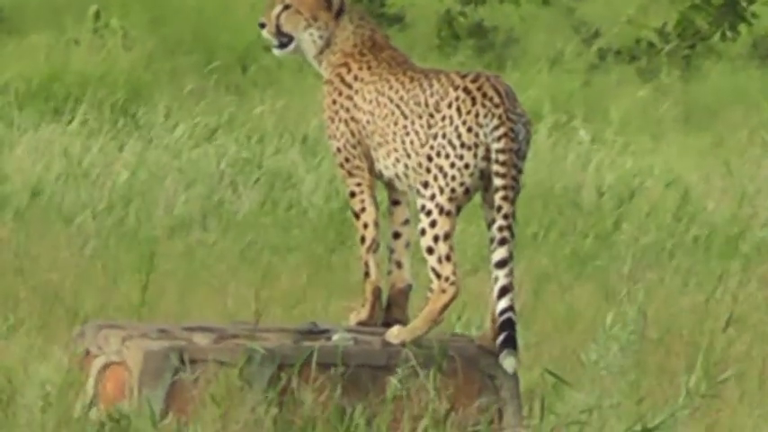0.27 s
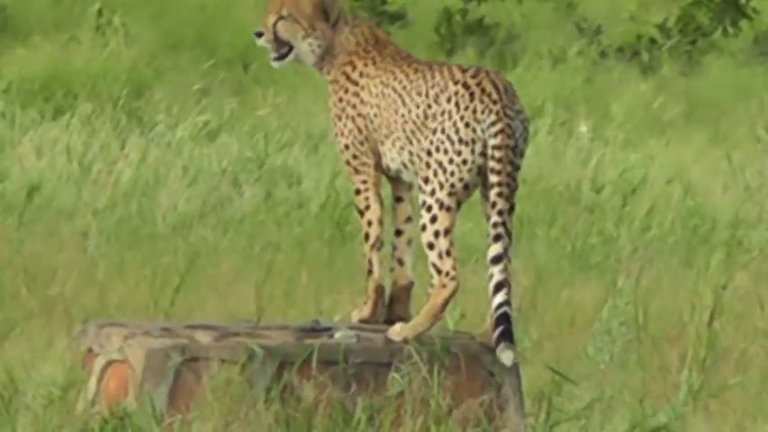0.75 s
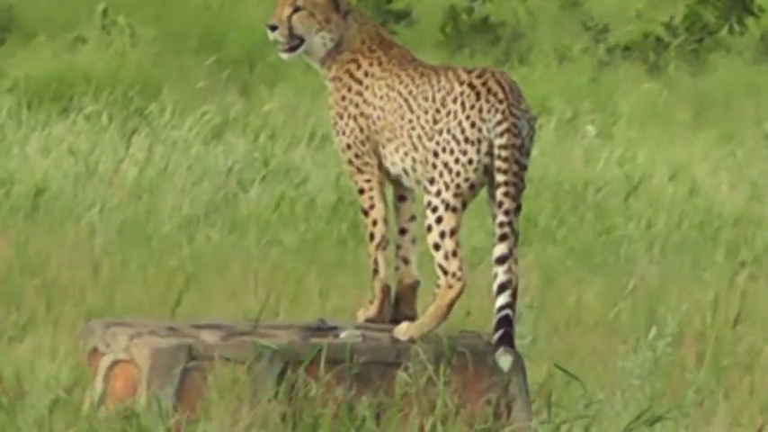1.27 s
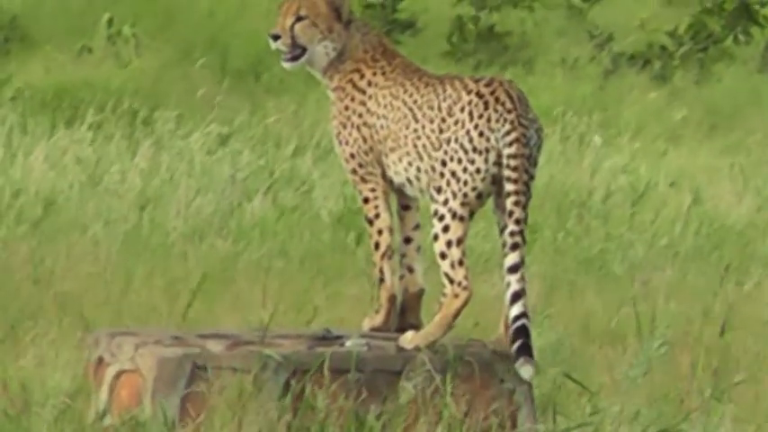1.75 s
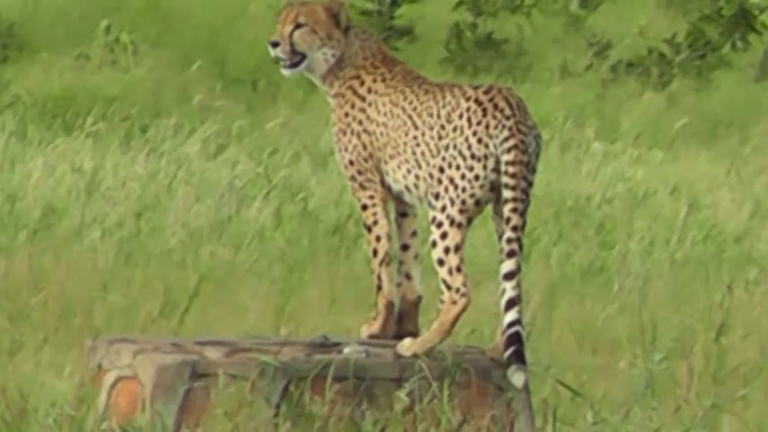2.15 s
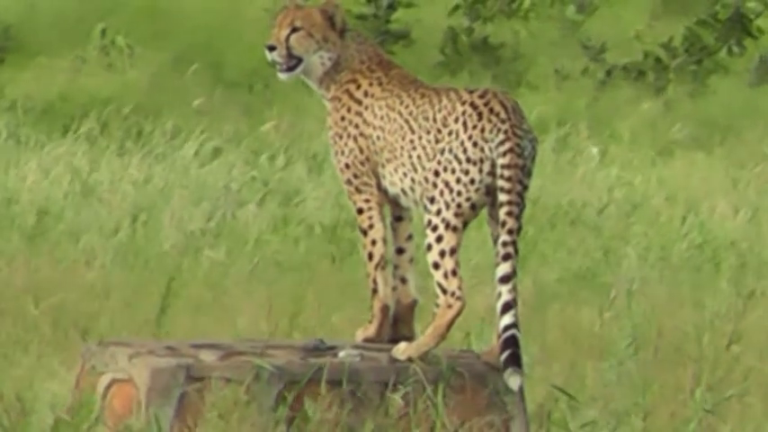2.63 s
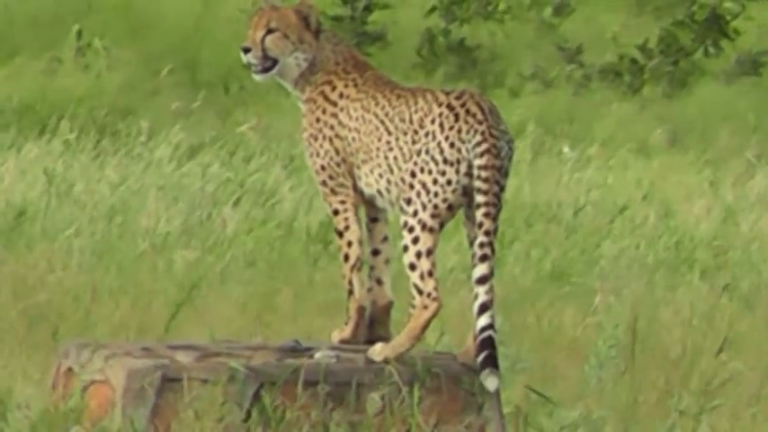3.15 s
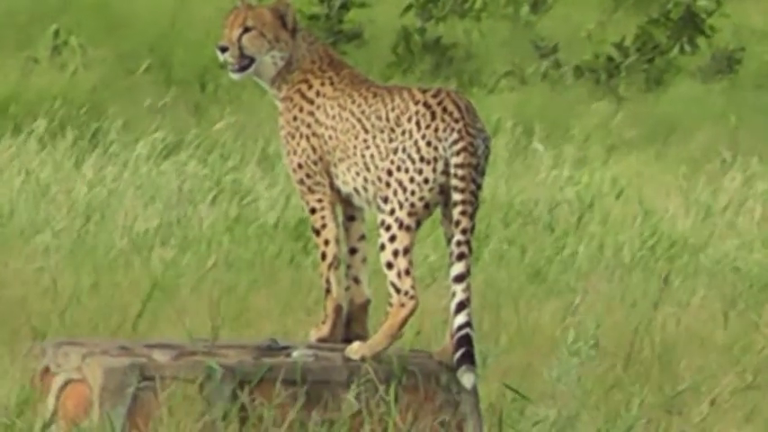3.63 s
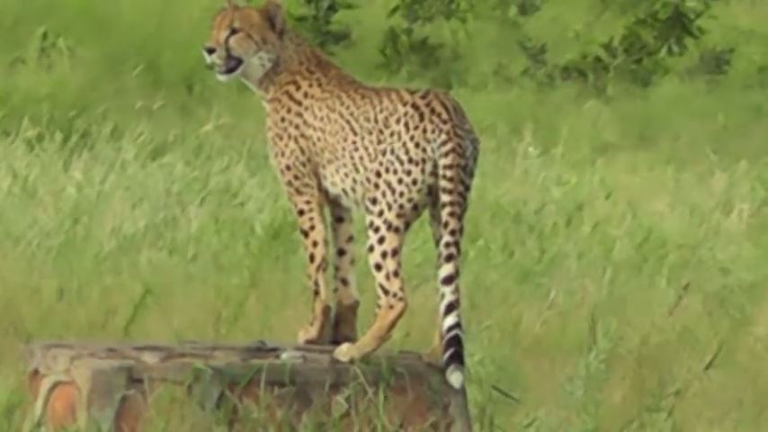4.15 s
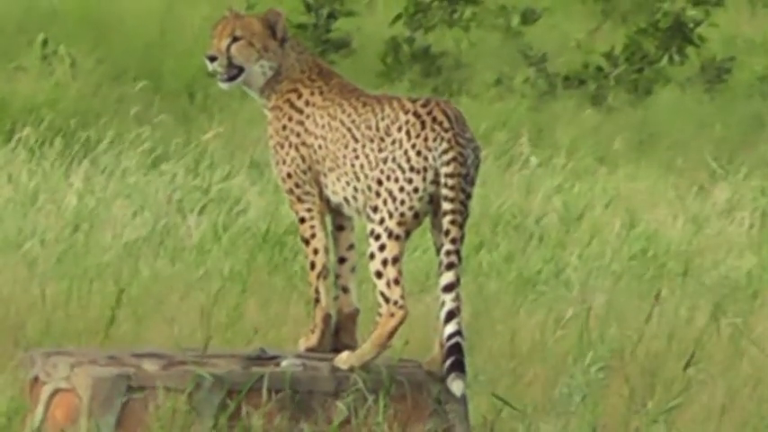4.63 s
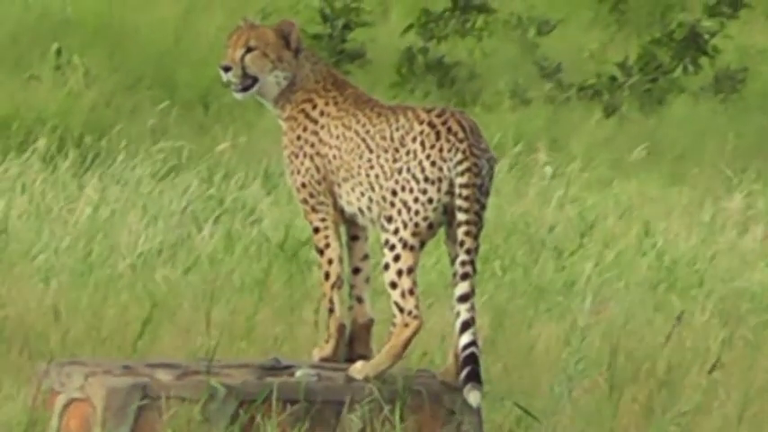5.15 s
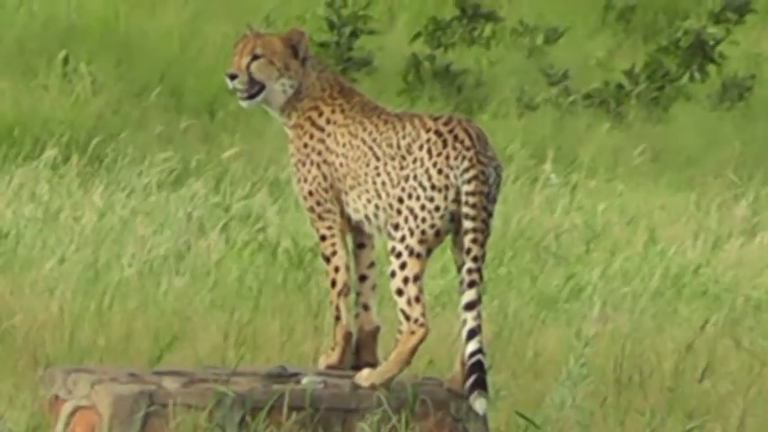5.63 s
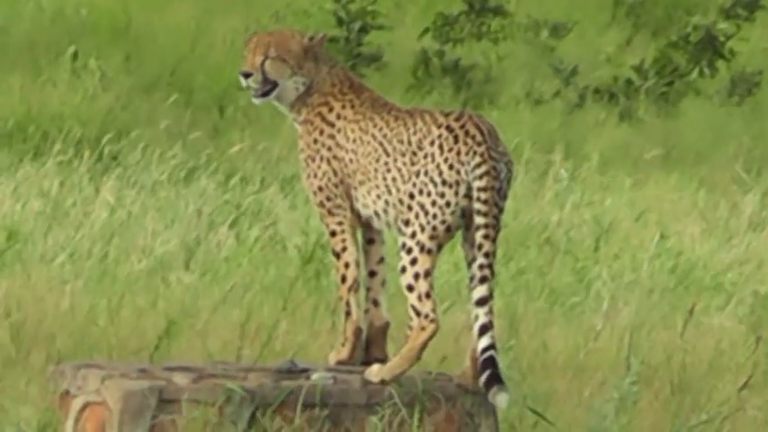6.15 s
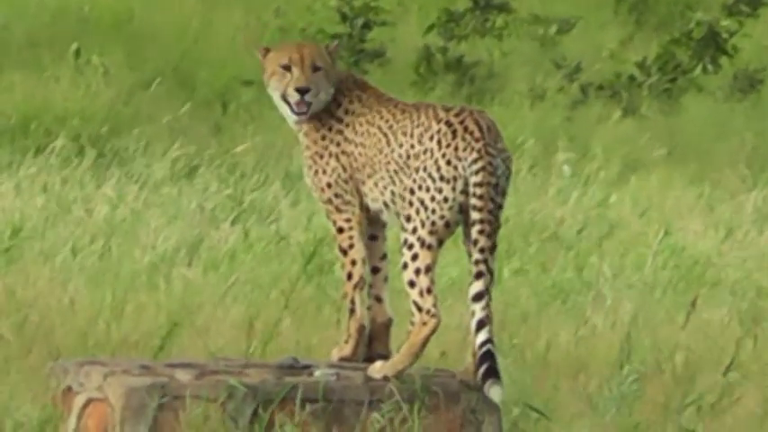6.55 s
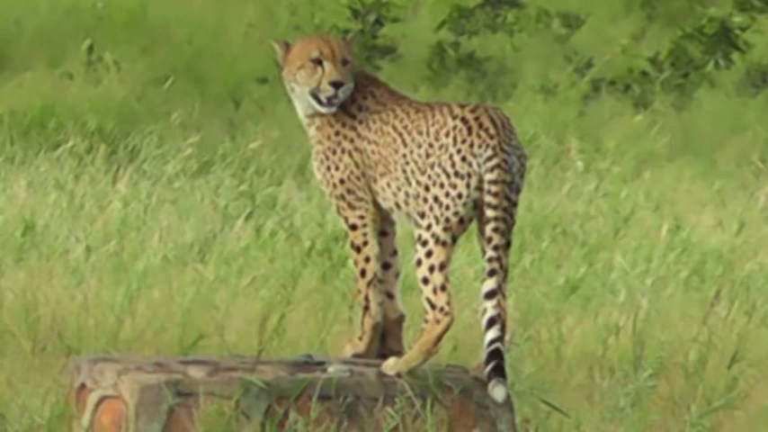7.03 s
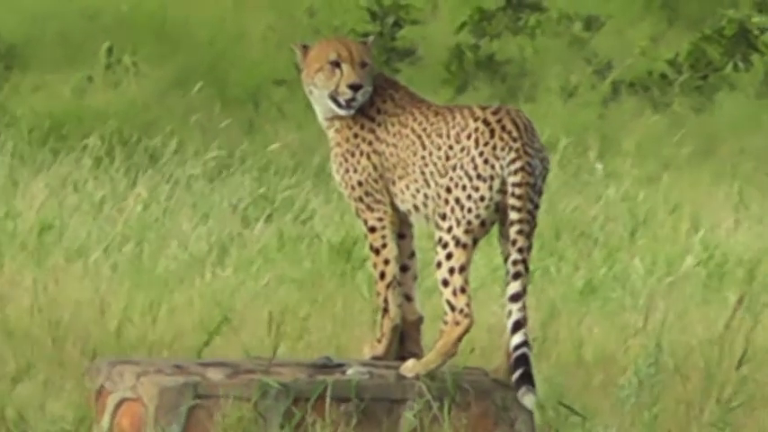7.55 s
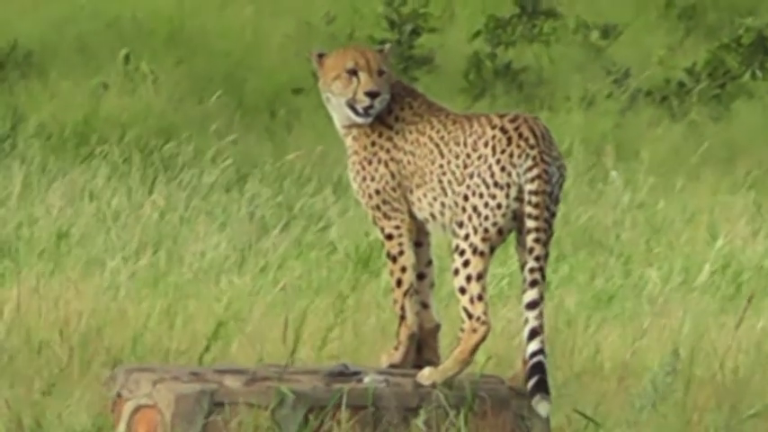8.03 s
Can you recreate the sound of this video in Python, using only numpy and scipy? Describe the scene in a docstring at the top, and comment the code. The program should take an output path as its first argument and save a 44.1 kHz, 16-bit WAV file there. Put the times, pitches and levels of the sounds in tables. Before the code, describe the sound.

Open grassland with low wind thumping on the microphone. A cheetah, slightly left and fairly near, utters a very short, high, falling chirp like a bird's, and a nearby camera immediately rattles off three mechanical shutter clacks. A quieter stretch follows with faint insects, thin small-bird notes and a far bird hooting and trilling. Gusts rise again, and the cheetah chirps a second time near the end.

```python
"""Cheetah chirps and a camera burst

A cheetah gives two short, falling, bird-like chirps in open grassland, built from harmonics through a throat colour.
After the first, a camera fires three frames: clusters of noise clacks, body rings and motor noise.
Gusts of low noise buffet the microphone. Far off a bird hoots and trills, small birds give thin
sliding notes and insects chirp in pulsed tones, over knocks, rustles and the hush of the meadow."""
import sys
import numpy as np
from scipy import signal
from scipy.fft import rfft, irfft, next_fast_len
from scipy.io import wavfile
from scipy.ndimage import uniform_filter1d, map_coordinates

SR = 44100
rng = np.random.default_rng(int(sys.argv[2]) if len(sys.argv) > 2 else 0)


def master_out(mix):
    """Clip the mix to full scale and print it as 16-bit PCM to the path in sys.argv[1]."""
    frames = np.transpose(np.atleast_2d(mix))
    ceiling = np.clip(frames, -1, 1)
    pcm = np.round(ceiling * 32767).astype(np.int16)
    wavfile.write(sys.argv[1], SR, pcm)


N = 365148

# Cheetah chirps. Each row: start in seconds, time until the voice breaks in seconds,
# time until it lets go in seconds, level ahead of the throat in dB, roughness of the clear part (0-1).
CHIRPS = [(0.8734, 0.031, 0.05, -28, 0.09), (6.7334, 0.043, 0.044, -28, 0.1)]
# Fundamental of each chirp, one list per chirp. Each row: time in seconds, pitch in Hz.
CHIRP_PITCH = [
    [(.878, 1122), (.911, 1070), (.924, 945), (.934, 800), (.944, 712), (.965, 680)],
    [(6.742, 1090), (6.766, 975), (6.777, 965), (6.785, 825), (6.801, 690), (6.812, 640)],
]
# Squeaks opening the chirps. Each row: start in seconds, length in seconds, start pitch in Hz,
# end pitch in Hz, level in dB.
SQUEAKS = [(0.86, .019, 2400, 2720, -48.5), (6.7216, 0.028, 2760, 2450, -38)]
# Throat and open mouth. Each row: frequency in Hz, gain in dB.
THROAT = [(400, -27), (720, -17), (1050, -19.5), (1450, -9.5), (1750, -15.5), (2000, 3), (2280, -5),
          (2700, -10.5), (3250, -15.5), (3900, -30), (4500, -36), (5200, -37), (6500, -80)]
# Echo from the bushes; the cat turns its head away. Each row: time in seconds, echo gain in dB.
FACING = [(0, -32), (6.2, -33), (6.5, -52)]
ATTACK_S, RELEASE_DB_PER_S = 0.0074, 950
BREAK_S = 0.0014  # time scale of the break from clear whistle to full voice
CLEAR_ODD_DB, BROKEN_ODD_DB = -37, -0.5  # odd harmonics before and after the break
SLACK_ROUGH, SLACKEN_S = 0.35, 0.0023  # roughness (0-1) after letting go, time scale of its onset

# Shutter releases. Each row: start in seconds, gain in dB.
FRAMES = [(1.0950, -1.5), (1.3056, -1.5), (1.5162, -1.5)]
# Mirror and shutter contacts in a frame. Each row: delay in seconds, level in dB, t60 in seconds,
# treble corner in Hz.
CONTACTS = [(0, -30.5, 0.077, 6500), (.005, -22.5, 0.054, 15000), (.0112, -21.5, 0.027, 10800),
            (0.016, -26.5, 0.039, 7000), (0.053, -31, 0.081, 9000), (0.0563, -35.5, 0.039, 9000),
            (0.0691, -25.5, 0.048, 22000), (.080, -27.5, 0.057, 11000), (.086, -44, .07, 9000),
            (.105, -37.5, 0.062, 18000), (.1645, -27.5, 0.025, 5650), (.168, -26, 0.027, 3990),
            (.177, -38, 0.029, 3500)]
# Camera body rings. Each row: delay in seconds, frequency in Hz, level in dB, t60 in seconds.
BODY_RINGS = [(.009, 450, -37.5, 0.076), (.055, 960, -36, 0.025), (.055, 1273, -36.5, 0.029),
              (.080, 260, -44, 0.053), (.080, 860, -37, .025), (.084, 642, -36.5, 0.051)]
# Colour of the casing. Each row: frequency in Hz, relative level in dB.
CASING = [(150, -6), (330, -14), (650, 0.5), (1200, -10), (1750, 3.5), (2150, 0), (2550, 4.5), (3100, 3),
          (4400, 2), (5400, 4), (8500, 0.5), (12000, 3), (16000, -5.5)]
# Motor recocking the shutter. Each row: delay in seconds, level in dB.
WINDER = [(.07, -52.5), (.10, -40.5), (.125, -53), (.165, -46), (.19, -54), (.23, -70)]
# Colour of the motor and gears. Each row: frequency in Hz, relative level in dB.
GEARS = [(200, -15), (880, -7.5), (1020, -1.5), (1200, -1), (1480, -10), (1700, 2.5), (2050, -3),
         (2400, -3.5), (4000, -7), (10000, -18.5), (16000, -28)]

# Steady wind on the microphone. Each row: time in seconds, strength ahead of the gains in dB.
WIND = [(0, -33), (.55, -44.5), (1.0, -41), (1.25, -50), (2.4, -55.5), (3.6, -49.5), (4.8, -51.5),
        (5.93, -53), (6.1, -43.5), (6.85, -39), (7.35, -39.5), (7.93, -34.5), (8.06, -48), (8.28, -52.5)]
# Gusts on top of it. Each row: peak time in seconds, half width (to 1/e of the power) in seconds,
# strength ahead of the gains in dB, flutter relative to the strength in dB.
GUSTS = [(.07, 0.02, -35, -23), (.16, 0.035, -32, -14), (.3, 0.06, -37, -25), (.46, 0.043, -33, -20),
         (.87, 0.067, -30, -16), (1.52, .04, -39.5, -24), (2.62, 0.094, -45, -12.5),
         (3.18, 0.12, -43.5, -16), (4.42, 0.03, -50, -10), (5.59, 0.032, -45, -8.5),
         (6.19, 0.073, -36, -13), (6.525, 0.014, -23, -9), (6.615, 0.044, -28.5, -3.5),
         (7.03, 0.057, -31.5, -13.5), (7.501, 0.055, -24.5, -13.5), (7.59, 0.034, -24, -24),
         (7.675, 0.034, -19.5, -13), (7.89, 0.026, -24.5, -11), (7.99, 0.027, -34.5, -19)]
# Colour of the buffeting. Each row: frequency in Hz, relative density in dB per Hz.
BUFFET = [(10, -6.5), (24, 4.5), (45, -1.5), (80, -8.5), (120, -25.5), (170, -30), (300, -94)]
# Colour of the flutter. Each row: frequency in Hz, relative density in dB per Hz.
FLUTTER = [(60, -17), (115, 8.5), (160, -3.5), (230, -7), (320, -22), (500, -29), (1200, -54.5)]
# Colour of the roar in the hardest gusts. Each row: frequency in Hz, relative density in dB per Hz.
ROAR = [(100, -6), (250, 3), (400, -19), (700, -20.5), (1500, -30), (3000, -70)]
WIND_FLUTTER_DB, UNREST_DB = -12.5, 1.5  # flutter relative to steady wind; scale of its random swing

# Soft knocks, ticks and rustles. Each row: start in seconds, level in dB, centre in Hz,
# width in octaves, t60 in seconds.
TICKS = [(1.273, -36, 686, 0.14, 0.052), (2.29, -61, 6000, 1, 0.19), (2.315, -58, 1500, 1.4, .12),
         (2.9025, -46.5, 845, 0.17, 0.1), (2.906, -46, 270, 0.97, 0.19), (2.92, -51, 750, 0.42, 0.11),
         (3.297, -54, 9500, 0.3, 0.047), (6.8452, -50.5, 2500, 1.5, 0.058), (7.264, -58, 1000, 1.3, 0.55),
         (7.32, -58, 750, 0.54, 0.64), (7.9795, -41.5, 2600, 0.82, 0.019)]

# Far bird's arched hoots. Each row: start in seconds, length in seconds, top pitch in Hz, level in dB.
HOOTS = [(2.804, 0.062, 1060, -58), (4.798, 0.059, 1040, -53.5), (4.87, 0.027, 894, -59),
         (5.114, 0.022, 963, -52), (5.13, 0.027, 928, -53), (5.793, 0.075, 827, -63.5)]
# Far bird's trills. Each row: start in seconds, length in seconds, top pitch in Hz, level ahead of the trim in dB.
TRILLS = [(3.235, .577, 970, -58), (5.185, .577, 975, -51.5)]
HOOT_ARCH = 0.266  # share by which a hoot's ends lie under its top
# place of the pitch peak (share of the length), curvature of the droop, softening of the ends
TRILL_TOP, TRILL_DROOP, TRILL_FADE_DB = 0.302, 0.13, 5

# Small bird's repeated falling note. Each row: start in seconds, level ahead of the trim in dB.
REPEATED_NOTES = [(.61, -67), (1.87, -66), (2.49, -62), (2.92, -67), (3.39, -71), (3.72, -68), (4.07, -70),
                  (4.29, -70), (5.21, -68), (5.49, -67), (5.80, -68), (6.14, -73), (7.27, -66), (7.54, -69),
                  (8.08, -70)]
# Whistles of other distant birds. Each row: start in seconds, start pitch in Hz, end pitch in Hz,
# length in seconds, peak level in dB.
NOTES = [(.225, 4230, 4240, 0.033, -66), (.745, 2720, 3070, 0.043, -62), (1.85, 4010, 3920, 0.074, -67),
         (2.69, 3560, 3080, 0.054, -67), (5.97, 2800, 2500, 0.037, -65), (6.12, 2530, 2420, 0.05, -66.5),
         (6.39, 2450, 2380, 0.035, -61)]

# Cricket bouts. Each row: start in seconds, end in seconds, period in seconds, level ahead of the trim in dB.
CRICKET = [(0.111, 1.1, 0.21, -65.5), (1.73, 2.3, .245, -64), (2.674, 3.0, .225, -66),
           (3.15, 3.55, 0.26, -60.5), (3.654, 5.8, .228, -67), (6.573, 8.2, 0.24, -67)]
# Short high insect buzzes. Each row: start in seconds, level ahead of the gain in dB.
BUZZES = [(7.298, -58.5), (7.571, -55.5), (8.04, -62.5), (8.19, -61)]
CRICKET_SCATTER_S, CRICKET_SCATTER_DB = 0.0074, 1.7  # standard deviations from chirp to chirp

# Scatter from grass and bushes. Each row: frequency in Hz, t60 in seconds.
FIELD = [(200, 0.23), (2000, 0.59), (10000, 0.055)]
# Colour of the meadow hush. Each row: frequency in Hz, relative density in dB per Hz.
MEADOW = [(100, -7.5), (215, -1.5), (300, -4), (420, -5.5), (850, -8.5), (1200, -11.5), (2500, -14),
          (4500, -16.5), (5800, -18.5), (7700, -21.5), (11000, -24), (15800, -24.5)]
# Level of the hush. Each row: time in seconds, level ahead of the gain in dB.
AIR = [(0, -59), (2, -59.5), (4, -60.5), (6, -61), (7.3, -60), (8.28, -59.5)]
# Wind in the distant bushes. Each row: time in seconds, level in dB.
BREEZE = [(0, -71), (2.2, -71.5), (3.8, -66.5), (4.4, -64), (5.2, -61.5), (6.2, -65), (7.4, -64),
          (8.28, -64)]
# Colour of that wind. Each row: frequency in Hz, relative density in dB per Hz.
BUSHES = [(150, -5), (380, -4), (600, -6), (900, -4), (1300, -17), (3000, -22), (8000, -45)]
# Stereo tilt of the meadow. Each row: frequency in Hz, left minus right in dB.
LEAN = [(100, 0.5), (380, -5), (1300, -4.5), (2400, -4), (4400, -2), (15000, -2.5)]
# Default stereo likeness of noise. Each row: frequency in Hz, left-right correlation (-1 to 1).
ALIKE = [(100, 0.15), (300, 0.25), (640, 0.15), (1400, 0.059), (4000, 0), (15000, 0)]
TOP_HZ = 15900  # band limit


def cheetah(jitter=0.15, shimmer=0.38, rasp=0.72):
    """A squeak drops to a whistle on the second harmonic; as the folds slacken, odd harmonics join and the pitch falls."""
    out = np.zeros(N)
    t = np.arange(SR // 10) / SR
    harmonic = np.arange(1, 8)[:, None]
    for (s, clear_s, hold_s, level_db, clear_rough), pitch in zip(CHIRPS, CHIRP_PITCH):
        hz, = curves(pitch, s + t)
        odd_db = CLEAR_ODD_DB + (BROKEN_ODD_DB - CLEAR_ODD_DB) * step(t - clear_s, BREAK_S)
        rough = clear_rough + (SLACK_ROUGH - clear_rough) * step(t - hold_s, SLACKEN_S)
        swell = np.minimum(t / ATTACK_S, 1) ** 2
        envelope = swell * amp(level_db - RELEASE_DB_PER_S * np.maximum(t - hold_s, 0))
        phase = turns(hz * (1 + jitter * rough * wobble(690, len(t))))
        gains = shape(THROAT)(harmonic * hz) * amp(odd_db * (harmonic % 2))
        partials = gains * np.sin(harmonic * phase)
        voice = np.sqrt(2) * partials.sum(0) * (1 + shimmer * rough * wobble(955, len(t)))
        turbulence = rasp * rough * noise(shape(THROAT), size=len(t))[0]
        add(out, s, envelope * (voice + turbulence))
    for s, length_s, from_hz, to_hz, db in SQUEAKS:
        add(out, s, whistle(from_hz + (to_hz - from_hz) * progress(length_s), db))
    return out


def bush_echo(x, delay_s=0.112):
    """One weak return from a line of bushes, strongest while the cat faces them."""
    out = np.zeros(N)
    echo_db, = curves(FACING, np.arange(N) / SR)
    add(out, delay_s, amp(echo_db) * x)
    return out


def shutter(attack_s=0.0011, repeat=0.75):
    """Each frame: the mirror slaps up, the curtains run, the mirror drops and bounces, a motor recocks and latches."""
    out = np.zeros((2, N))
    t = np.arange(SR // 4) / SR
    rise = 1 - np.exp(-t / attack_s)
    for delay_s, db, t60_s, bright_hz in CONTACTS:
        modes = resonances(depth_db=4.5)
        colour = lambda hz: shape(CASING)(hz) * modes(hz) / np.sqrt(1 + (hz / bright_hz) ** 4)
        part = noise(colour, size=len(t))  # shared: a part rings much alike in every frame
        for s, frame_db in FRAMES:
            clack = np.sqrt(repeat) * part + np.sqrt(1 - repeat) * noise(colour, size=len(t))
            decay = amp(frame_db + db - 60 * t / t60_s)
            add(out, s + delay_s, clack * grit(depth_db=1.5, size=len(t)) * rise * decay)
    for s, frame_db in FRAMES:
        for delay_s, hz, db, t60_s in BODY_RINGS:
            ring = np.sin(2 * np.pi * hz * t + 0.25 * wobble(150, len(t)))
            decay = amp(frame_db + db - 60 * t / t60_s)
            add(out, s + delay_s, pan(ring, lean_db=-12) * rise * decay)
        motor_db, = curves(WINDER, t)
        add(out, s, amp(motor_db) * noise(shape(GEARS), size=len(t)))
    return pan(out, lean_db=-2.5)


def wind(buffet_gain_db=2, flutter_gain_db=-1.5, calm_db=-62, roar_db=-11.0, gust_db=-41):
    """Eddies thump on the microphone; stronger gusts break into a faster flutter, the hardest into a brief roar."""
    buffet_db, flutter_db = gusts()
    eddies = noise(shape(BUFFET), [(30, 0.69), (100, 0.16)])
    # even pressure, so that the gusts set the level
    eddies /= np.sqrt(uniform_filter1d(np.mean(eddies ** 2, 0), size=SR // 12))
    above = lambda threshold_db: amp(flutter_db) / (1 + amp(threshold_db - flutter_db) ** 2)
    flutter = amp(flutter_gain_db) * above(calm_db) * noise(shape(FLUTTER), [(150, 0.23)])
    roar = amp(roar_db + 4.1 * wobble(60)) * above(gust_db) * noise(shape(ROAR), [(300, 0.19)])
    return pan(amp(buffet_db + buffet_gain_db) * eddies + flutter + roar, lean_db=0.8)


def gusts():
    """Bell-shaped gusts add their power to the steady wind: buffeting and flutter strengths in dB."""
    t = np.arange(N) / SR
    steady_db, = curves(WIND, t)
    buffet = amp(steady_db + UNREST_DB * wobble(23)) ** 2
    flutter = buffet * amp(WIND_FLUTTER_DB + 3.1 * wobble(12)) ** 2
    for s, width_s, db, flutter_db in GUSTS:
        power = amp(db) ** 2 * np.exp(-((t - s) / width_s) ** 2)
        buffet = buffet + power
        flutter = flutter + power * amp(flutter_db) ** 2
    return 10 * np.log10(buffet), 10 * np.log10(flutter)


def ticks(attack_s=0.00045):
    """Small knocks and rustles: gritty noise bands that start sharply and die away."""
    out = np.zeros((2, N))
    t = np.arange(SR // 2) / SR
    rise = 1 - np.exp(-t / attack_s)
    for s, db, centre_hz, octaves, t60_s in TICKS:
        band = lambda hz: np.exp(-(np.log2((hz + 1) / centre_hz) / octaves) ** 2 / 2)
        burst = noise(band, [(1000, 0.7)], size=len(t))
        add(out, s, burst * grit(depth_db=4.0, size=len(t)) * amp(db - 60 * t / t60_s) * rise)
    return out


def far_bird(trill_trim_db=-1, trill_hz=34.7, bend=0.2):
    """Arched hoots, and rolling trills that swell and droop, their every pulse arching in pitch."""
    out = np.zeros(N)
    for s, length_s, top_hz, db in HOOTS:
        add(out, s, whistle(top_hz * (1 - HOOT_ARCH * (2 * progress(length_s) - 1) ** 2), db))
    for s, length_s, top_hz, level_db in TRILLS:
        u = progress(length_s)
        hz = top_hz * (1 - TRILL_DROOP * (u - TRILL_TOP) ** 2)
        db = level_db - TRILL_FADE_DB * (2 * u - 1) ** 2
        pulse = np.sin(np.pi * trill_hz * length_s * u) ** 2
        tone = np.sin(turns(hz * (1 - bend * (1 - pulse) + 0.02 * wobble(200, len(u)))))
        gain = np.sqrt(2) * amp(trill_trim_db + db + wobble(38.3, len(u)))
        add(out, s, gain * pulse ** 1.75 * tone)
    return out


def small_birds(start_hz=6500, end_hz=5450, length_s=0.079, trim_db=-3):
    """Thin notes that slide and level off: one bird repeats its note, others whistle now and then."""
    out = np.zeros(N)
    repeated = [(s, start_hz, end_hz, length_s, db + trim_db) for s, db in REPEATED_NOTES]
    for s, from_hz, to_hz, span_s, db in repeated + list(NOTES):
        u = progress(span_s)
        slide_hz = to_hz + (from_hz - to_hz) * (1 - u) ** 2
        hz = slide_hz * (1 + 0.0098 * wobble(340, len(u)))
        add(out, s, amp(db) * np.sin(np.pi * u) * np.sin(turns(hz)))
    return out


def insects(cricket_hz=4955, cricket_trim_db=-1.0, chirp_s=0.118, buzz_hz=7700, buzz_s=0.021):
    """A cricket chirps in groups of four wing strokes; another insect gives short buzzes of three."""
    out = np.zeros(N)
    u = progress(chirp_s)
    for start_s, end_s, period_s, db in CRICKET:
        for s in np.arange(start_s, end_s, period_s):
            late_s, louder_db = rng.standard_normal(2) * [CRICKET_SCATTER_S, CRICKET_SCATTER_DB]
            strokes = np.sin(4 * np.pi * u) ** 2 * amp(2 * wobble(30, len(u)))
            tone = np.sin(turns(cricket_hz + 95 * wobble(401, len(u))))
            add(out, s + late_s, amp(db + cricket_trim_db + louder_db) * strokes * tone)
    u = progress(buzz_s)
    for s, db in BUZZES:
        strokes = np.sin(3 * np.pi * u) ** 2
        tone = np.sin(turns(buzz_hz + 220 * wobble(1240, len(u))))
        add(out, s, 1.3 * amp(db) * strokes * tone)
    return out


def scatter(x):
    """Grass and bushes send back a diffuse tail: noise decaying at a rate set by frequency."""
    hz, t, z = signal.stft(rng.standard_normal((2, SR // 2)), SR, nperseg=256)
    decay = amp(-60 * t / along(FIELD, hz)[:, None])
    tail = signal.istft(z * decay, SR, nperseg=256)[1]
    return signal.fftconvolve(x[None], tail / np.linalg.norm(tail[0]), axes=1)[:, :N]


def meadow(hush_gain_db=3.0):
    """The steady hush of grass, under a slowly changing sough of wind in the bushes."""
    t = np.arange(N) / SR
    hush = noise(shape(MEADOW)) * amp(hush_gain_db + curves(AIR, t)[0])
    sough = noise(shape(BUSHES)) * amp(curves(BREEZE, t)[0])
    tilt = lambda hz: amp(np.array([along(LEAN, hz), -along(LEAN, hz)]) / 2)
    return filtered(hush + sough, tilt)


def amp(db):
    """Decibels to gain."""
    return 10 ** (np.asarray(db) / 20)


def unit(x):
    """Scale to rms 1."""
    return x / np.sqrt(np.mean(x ** 2) + 1e-20)


def along(points, hz):
    """Read (Hz, value) points on a log axis."""
    f, v = np.transpose(points)
    return np.interp(np.log(hz + 1), np.log(f + 1), v)


def curves(rows, t):
    """Each column after the time, read at the times t."""
    s, *cols = np.transpose(rows)
    return [np.interp(t, s, c) for c in cols]


def add(track, s, x):
    """Mix x into the track at time s, cut at the end."""
    part = track[..., max(round(s * SR), 0):][..., :x.shape[-1]]
    part += x[..., :part.shape[-1]]


def wobble(rate, size=N):
    """A smooth random curve, rate knots a second."""
    knots = rng.standard_normal(size // 8 + 4)
    return map_coordinates(knots, [np.arange(size) * rate / SR], mode="mirror")


def turns(hz):
    """Running phase of a moving pitch, in radians."""
    return 2 * np.pi * np.cumsum(hz) / SR


def progress(length_s):
    """Runs from 0 to 1 over a note."""
    return np.linspace(0, 1, round(length_s * SR))


def step(t, width_s):
    """A smooth step from 0 to 1 around t = 0."""
    return (1 + np.tanh(t / (2 * width_s))) / 2


def whistle(hz, db):
    """A pure tone along a pitch path that swells and fades."""
    swell = np.sin(np.linspace(0, np.pi, len(hz)))
    return np.sqrt(2) * amp(db) * swell * np.sin(turns(hz))


def filtered(x, response):
    """x times a response of frequency."""
    n = x.shape[-1]
    m = next_fast_len(n + SR // 8)
    return irfft(rfft(x, m) * response(np.fft.rfftfreq(m, 1 / SR)), m)[..., :n]


def noise(colour, alike=ALIKE, size=N):
    """Stereo noise of rms 1 with a given colour and left-right likeness."""
    # the angle splits the power between mid and side
    turn = lambda hz: np.arccos(np.clip(along(alike, hz), -1, 1)) / 2
    split = lambda hz: colour(hz) * [np.cos(turn(hz)), np.sin(turn(hz))]
    mid, side = filtered(rng.standard_normal((2, size)), split)
    return unit(np.array([mid + side, mid - side]))


def shape(points):
    """The colour given by (Hz, dB) points."""
    return lambda hz: amp(along(points, hz))


def grit(depth_db, size):
    """A fast uneven gain of rms 1: a clack is a cluster of tiny impacts."""
    return unit(amp(depth_db * wobble(1400, size)))


def resonances(depth_db, spacing_hz=170):
    """The uneven colour of a small part with many close modes."""
    knots_hz = np.arange(0, SR / 2, spacing_hz)
    peaks_db = depth_db * rng.standard_normal(len(knots_hz))
    return lambda hz: amp(np.interp(hz, knots_hz, peaks_db))


def pan(x, lean_db):
    """Lean a sound to the left (positive) or right."""
    return x * amp([[lean_db / 2], [-lean_db / 2]])


def scene():
    """The cat a little to the left, the shutter and the far bird to the right, wind and meadow all round."""
    cat, bird = cheetah(), far_bird()
    thin = small_birds() + insects()
    calls = pan(cat, lean_db=3.5) + bush_echo(cat) + amp(-37) * scatter(cat)
    far_calls = pan(bird, lean_db=-5.0) + amp(-16.5) * scatter(bird)
    thin_calls = thin + amp(-5) * scatter(thin)
    return calls + far_calls + thin_calls + shutter() + ticks() + wind() + meadow()


def record(dry, notch_hz=180, notch_width_hz=12):
    """The recorder has a narrow dip in the bass and keeps nothing above its band limit."""
    dip = lambda hz: 1 - np.exp(-((hz - notch_hz) / notch_width_hz) ** 2 / 2)
    return filtered(dry, lambda hz: dip(hz) * (hz < TOP_HZ))


dry = scene()
out = record(dry)
master_out(out)
```